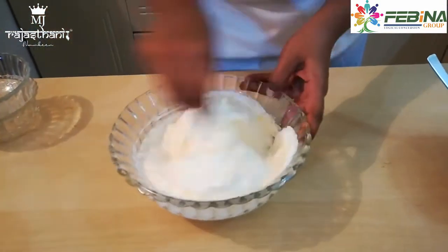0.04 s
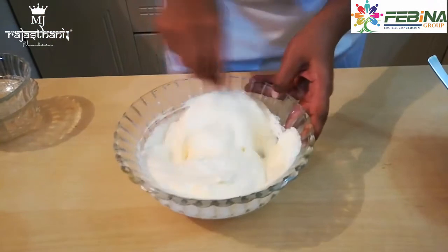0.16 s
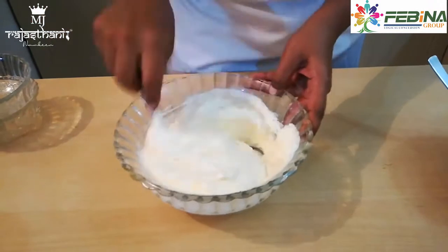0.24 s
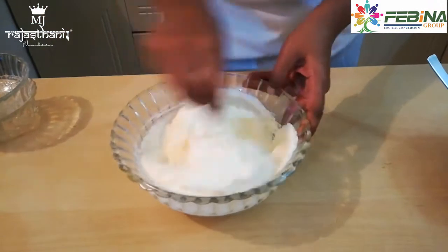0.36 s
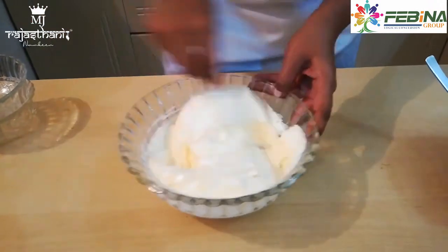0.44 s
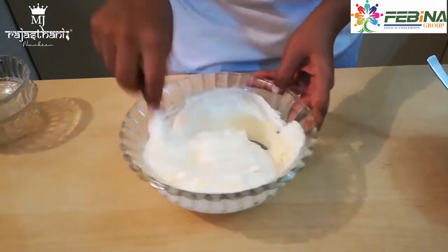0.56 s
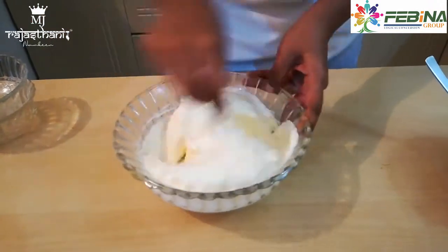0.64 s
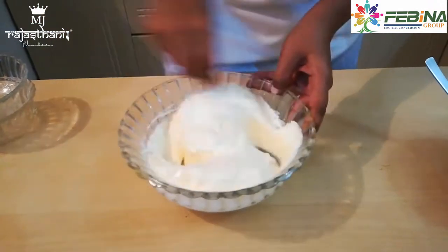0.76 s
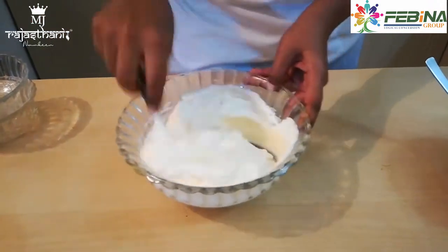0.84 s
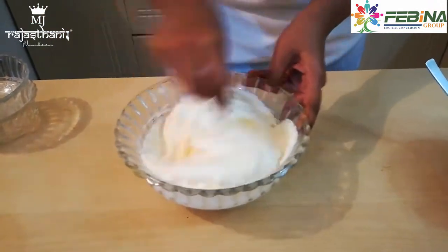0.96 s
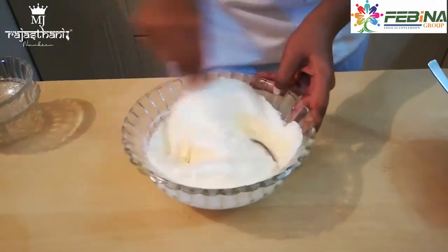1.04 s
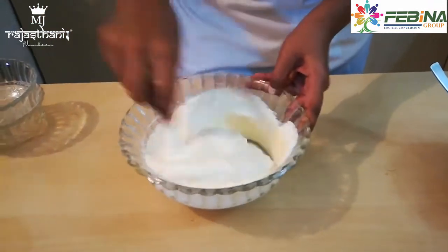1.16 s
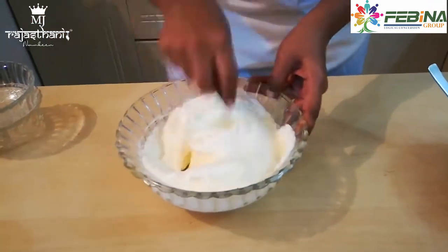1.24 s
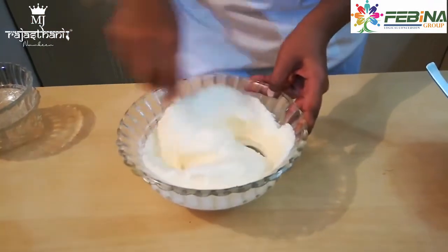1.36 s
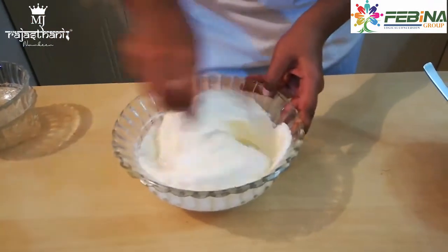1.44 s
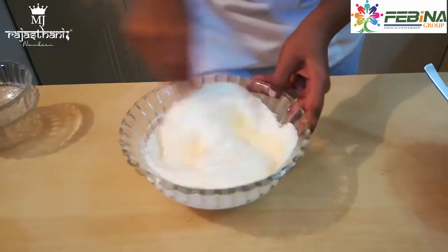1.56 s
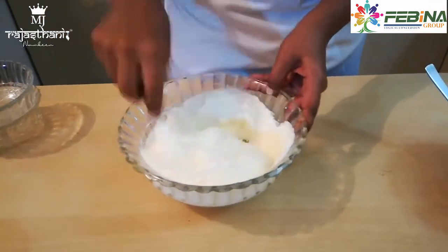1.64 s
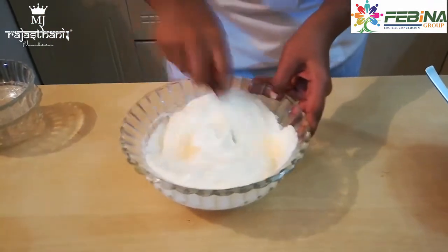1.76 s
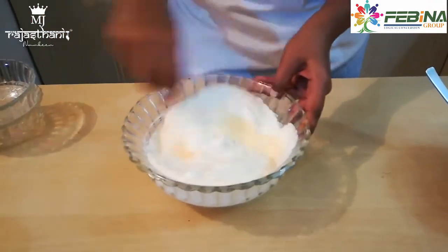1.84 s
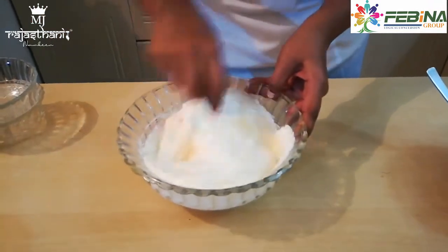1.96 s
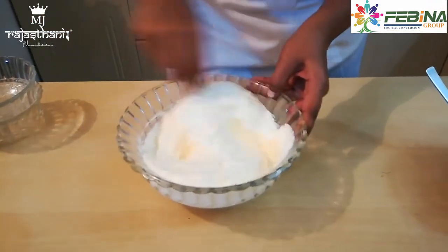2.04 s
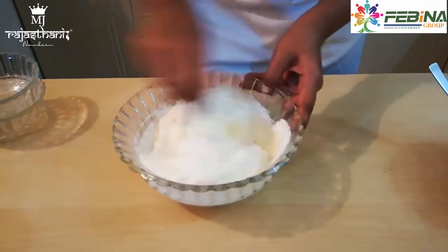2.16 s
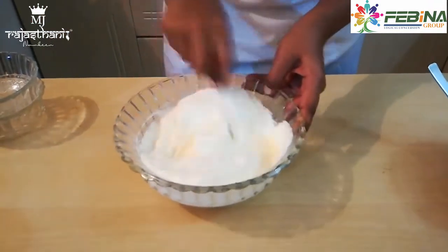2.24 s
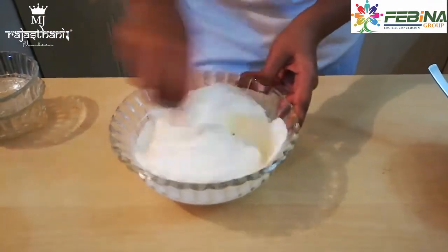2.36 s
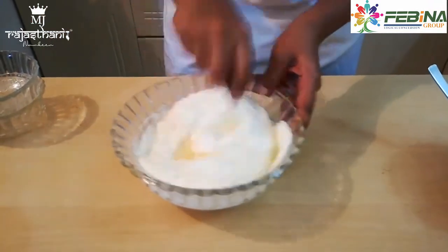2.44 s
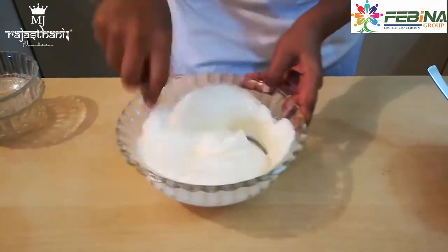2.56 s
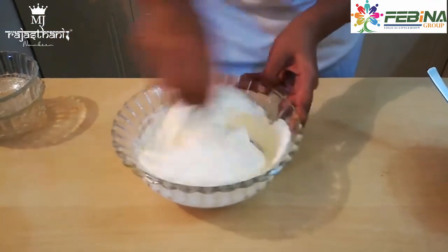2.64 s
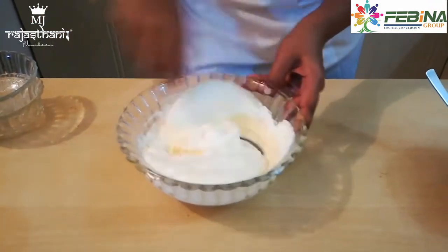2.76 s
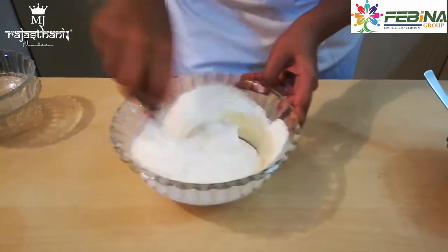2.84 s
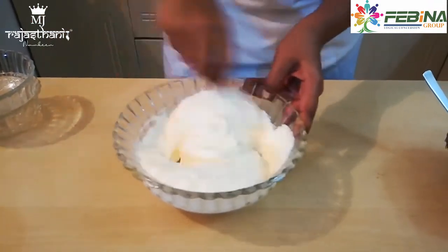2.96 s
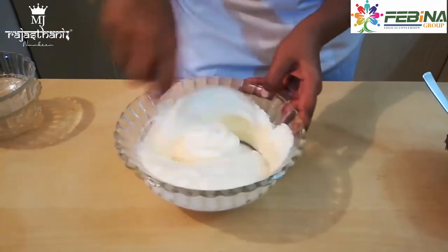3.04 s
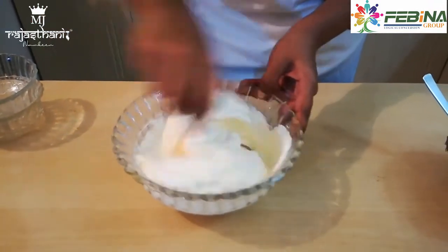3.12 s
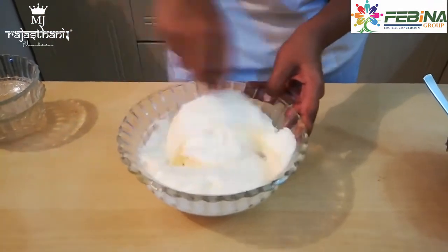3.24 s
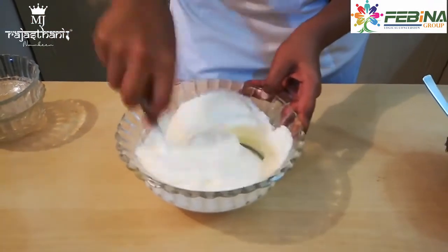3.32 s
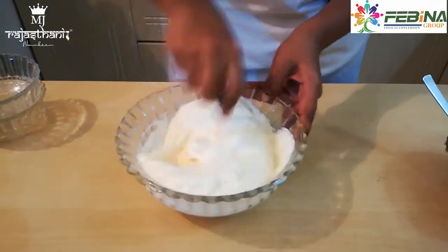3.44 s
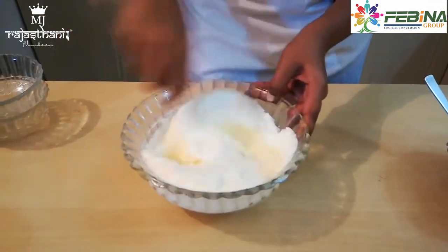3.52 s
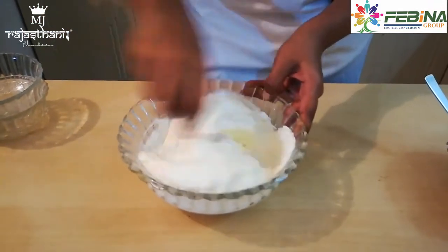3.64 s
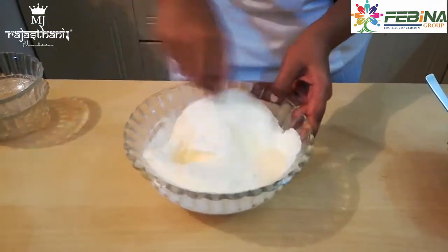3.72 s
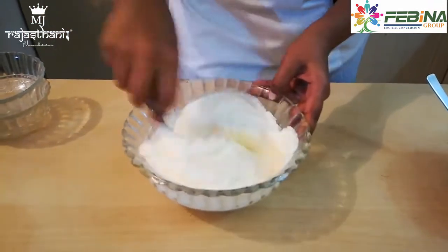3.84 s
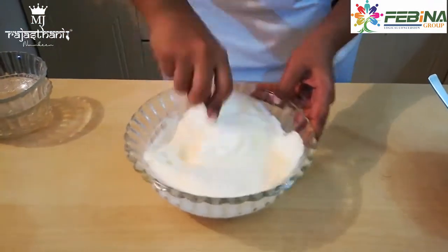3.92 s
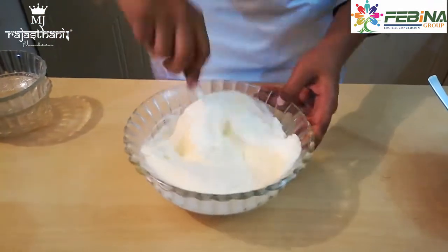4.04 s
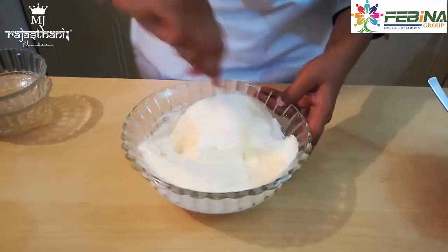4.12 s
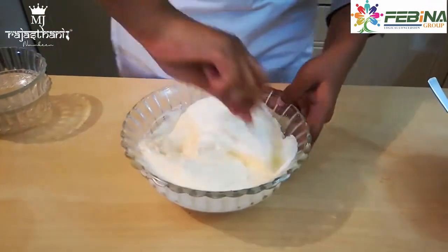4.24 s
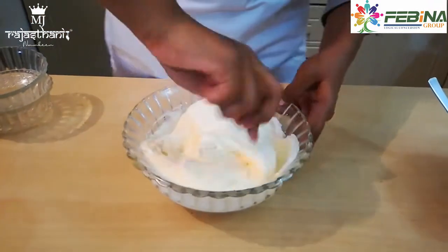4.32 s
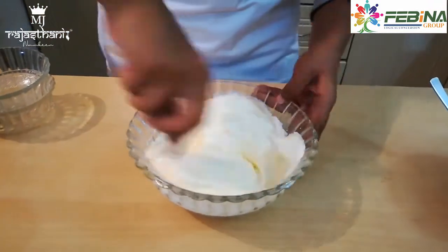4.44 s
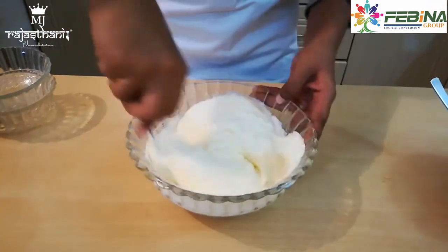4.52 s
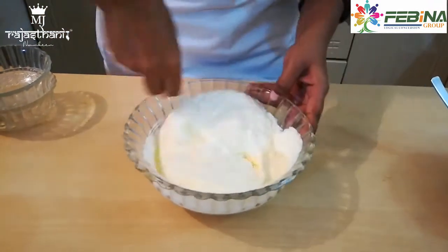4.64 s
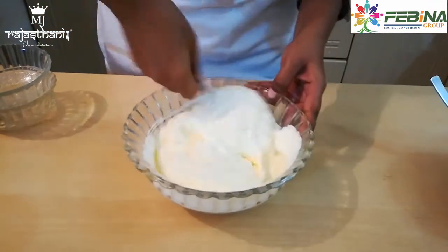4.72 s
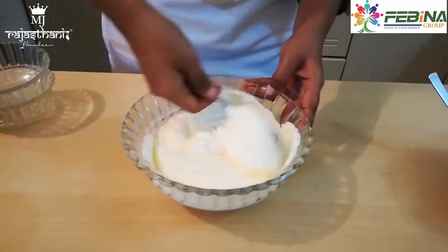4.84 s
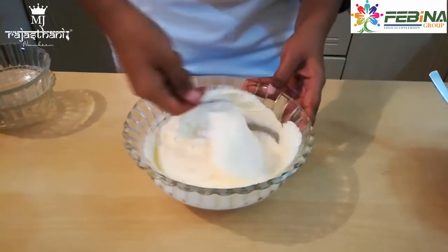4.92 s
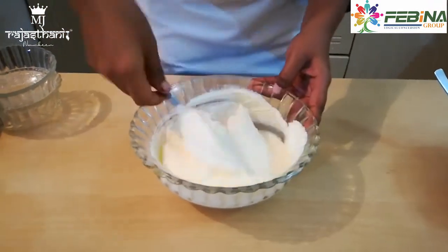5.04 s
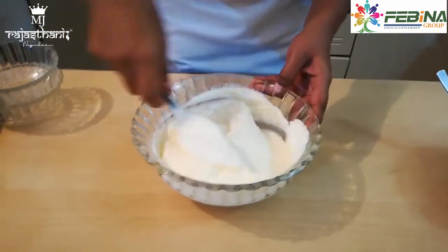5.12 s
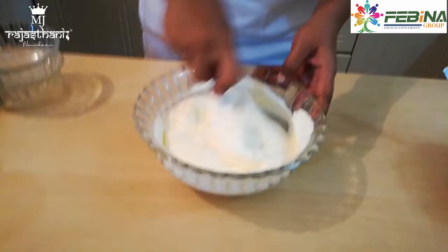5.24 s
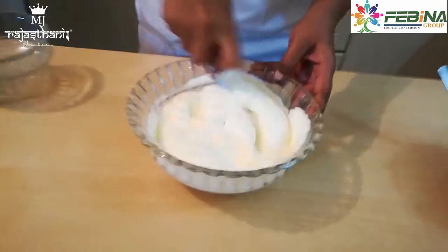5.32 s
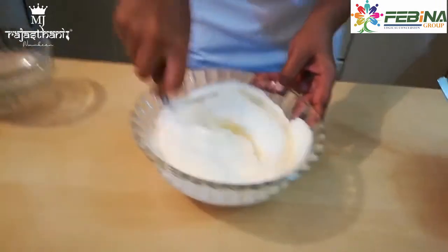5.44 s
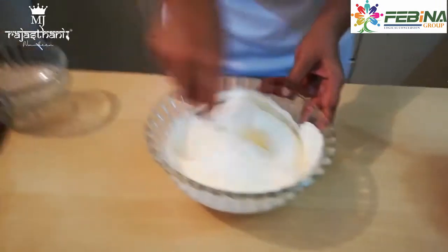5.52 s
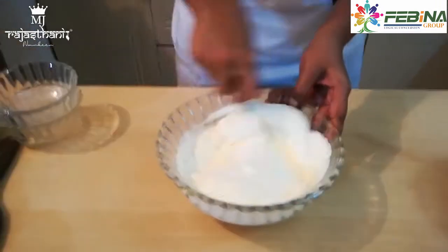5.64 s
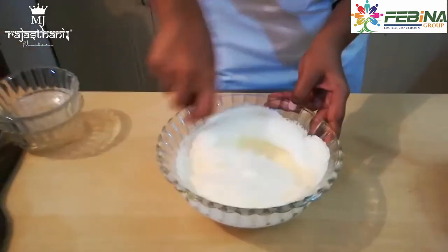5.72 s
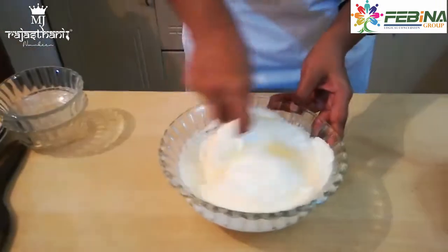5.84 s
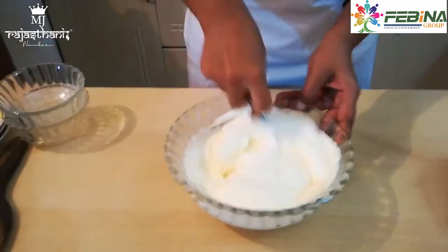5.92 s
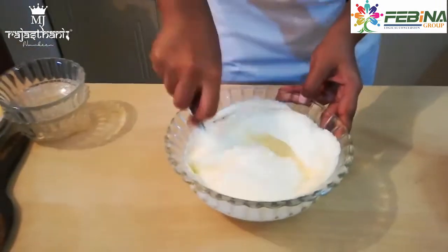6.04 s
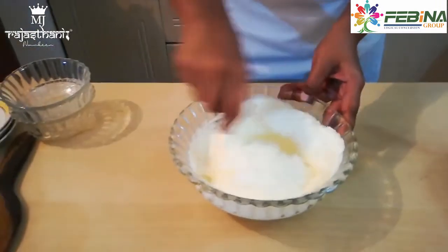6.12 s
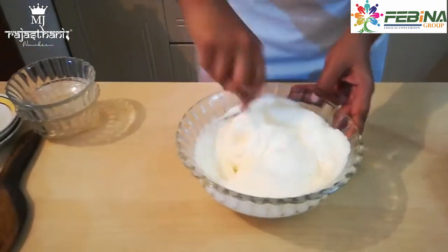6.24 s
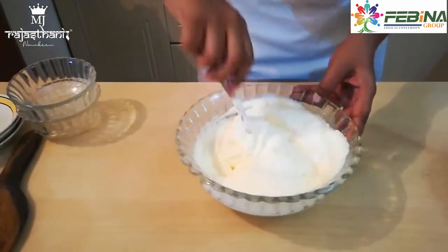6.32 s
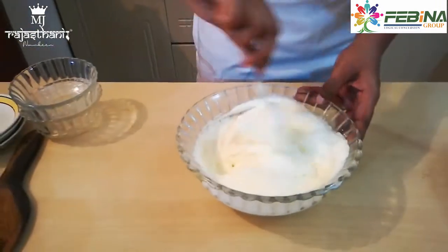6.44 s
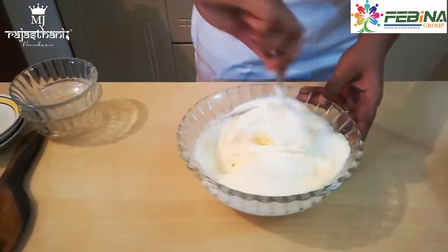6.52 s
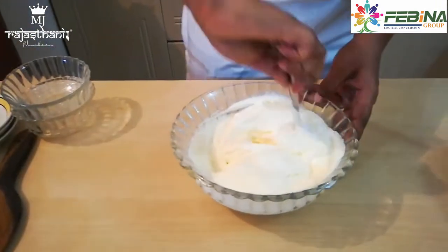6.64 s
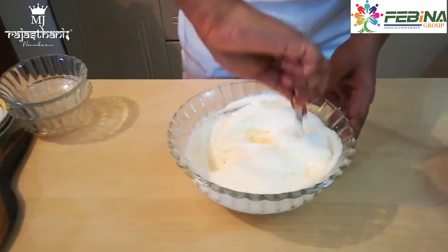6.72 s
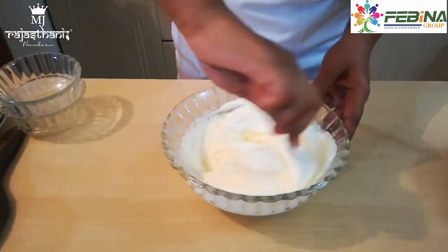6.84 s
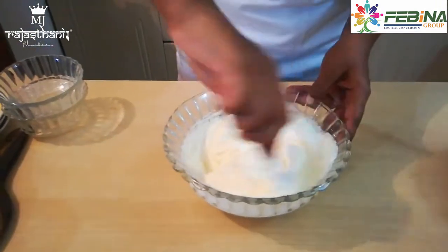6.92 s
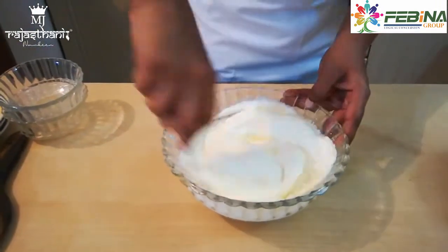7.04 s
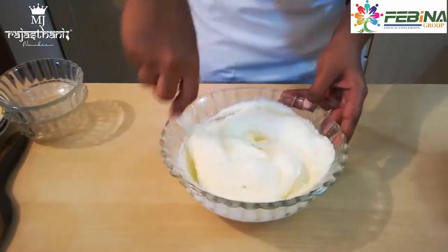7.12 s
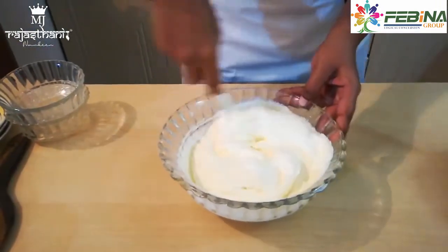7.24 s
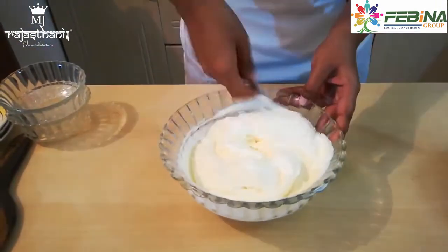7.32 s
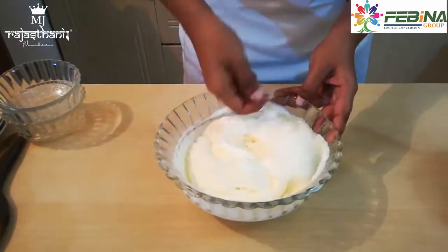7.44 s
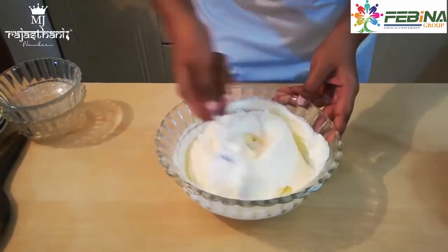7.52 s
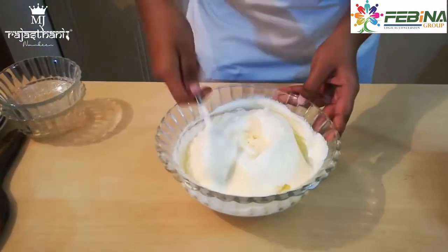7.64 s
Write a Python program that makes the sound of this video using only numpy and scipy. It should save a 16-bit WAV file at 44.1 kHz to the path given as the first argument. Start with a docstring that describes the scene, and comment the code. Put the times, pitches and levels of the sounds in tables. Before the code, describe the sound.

Fast wet churning with irregular spoon clinks on glass and dull thuds for four seconds, then slower separate clacks and soft plops in a bare room.

```python
"""A spoon beats thick cream in a glass bowl on a wooden table, in a bare, echoing kitchen with a faint hum.
It scrapes and churns from the start; soon short clacks (damped resonances) and wet pops join in.
Pushes thump the table (decaying sines) and flop the cream over (gritty noise through a cavity).
Now and then a gap slurps. Strokes come thick for about four seconds, then turn to sparser folding.
Noise echoes answer from the walls throughout."""
import sys
import numpy as np
from scipy import signal
from scipy.fft import rfft, irfft, next_fast_len
from scipy.io import wavfile
from scipy.ndimage import uniform_filter1d

SR = 44100
rng = np.random.default_rng(int(sys.argv[2]) if len(sys.argv) > 2 else 0)


def wav_out(sig):
    """Save sig, one row per channel (or a flat mono array), as 16-bit PCM at SR to the path in sys.argv[1]."""
    wavfile.write(sys.argv[1], SR, np.round(np.clip(np.atleast_2d(sig).T, -1, 1) * 32767).astype(np.int16))


N = 338667
TOP_HZ = 16000  # the microphone's band limit

# Levels in the event tables are relative: the functions shift them.
# Pushes of the spoon through the cream; at .125 the hollow body of the first clack:
# start_s, thump_db (table), plop_hz, plop_db, slap_db
PUSHES = [(.125, -57, 760, -39, -55), (.366, -39, 270, -52, -45), (.629, -38, 320, -40, -41.5),
          (.692, -42, 315, -39, -57), (.874, -39, 457, -44.5, -61), (.936, -37.5, 500, -34.5, -48),
          (1.16, -35, 374, -35, -46), (1.235, -37, 426, -39, -38.5), (1.484, -44, 493, -40.5, -41),
          (1.586, -35.5, 323, -38.5, -55), (1.729, -42.5, 430, -37.5, -40),
          (1.834, -34.5, 398, -43.5, -43.5), (1.981, -38.5, 356, -36.5, -37),
          (2.224, -38, 503, -44.5, -39.5), (2.451, -39.5, 380, -45, -39.5), (2.5299, -28, 440, -34.5, -36),
          (2.692, -38.5, 310, -37, -39.5), (2.922, -34.5, 490, -33, -32.5), (3.008, -40.5, 390, -43.5, -47),
          (3.18, -38.5, 344, -32, -42.5), (3.265, -33, 275, -34, -41), (3.371, -34, 350, -37, -51),
          (3.445, -37, 293, -29.5, -34.5), (3.668, -45, 517, -37, -61), (3.694, -39, 398, -33.5, -55),
          (3.768, -34, 293, -36, -59), (3.886, -30, 374, -35.5, -37.5), (4.472, -48, 600, -41.5, -46),
          (4.863, -47, 370, -54, -42.5), (5.569, -41.5, 400, -49, -59), (5.618, -45.5, 596, -45, -49),
          (5.859, -36, 333, -47, -51), (5.998, -46.5, 540, -46, -43.5), (6.2, -48, 740, -44, -46.5),
          (6.401, -75.5, 388, -51, -61), (6.929, -54, 714, -41, -46.5), (7.447, -43.5, 257, -56, -54)]
# The spoon meets the glass; at 3.911 a wall throws the clack back:
# start_s, knock_db, tick_hz, tick_db, crack_db
CLACKS = [(0.1237, -23, 5400, -19.5, -34), (.1259, -52, 3560, -27.5, -52), (0.3147, -51, 4200, -48, -59),
          (0.329, -58, 3870, -44.5, -70), (.388, -75, 5970, -56, -58), (.398, -58, 4000, -48, -71),
          (0.48, -65, 3984, -65, -52), (0.6308, -48, 3600, -39, -35.5), (.757, -42.5, 3980, -56, -54),
          (.934, -34, 3340, -35, -42.5), (.979, -58, 4690, -43, -56), (1.176, -39, 6000, -50, -66),
          (1.2074, -33.5, 3640, -37, -44), (1.329, -39, 4800, -36.5, -53), (1.481, -69, 3040, -34.5, -83),
          (1.4852, -59, 4350, -59, -34.5), (1.7298, -42, 2970, -36.5, -51), (1.9783, -46, 3600, -47, -34.5),
          (2.2104, -42, 4260, -30, -45), (2.306, -60, 6470, -48, -47), (2.364, -49, 4560, -45.5, -75),
          (2.4525, -36, 4280, -41.5, -37), (2.5306, -27.5, 2300, -51, -68), (2.6742, -41, 5240, -43, -48),
          (2.795, -54, 5280, -46, -54), (2.922, -42, 3770, -29, -67), (2.924, -47, 4370, -33, -37.5),
          (3.009, -53, 5000, -49, -58), (3.14, -70, 3540, -56, -53.5), (3.164, -33, 3900, -45, -69),
          (3.184, -40, 1980, -44, -68), (3.2667, -49, 5470, -53, -36), (3.395, -28.5, 3180, -30.5, -39),
          (3.396, -56, 5100, -34.5, -52), (3.448, -32, 2000, -46, -70), (3.5235, -39, 4700, -31, -28),
          (3.667, -36, 5330, -36, -66), (3.7697, -45, 5100, -45, -51), (3.8976, -22, 3600, -36, -34),
          (3.911, -27, 3640, -34.5, -44), (4.1328, -44, 3570, -51.5, -54), (4.473, -26, 4080, -29, -41),
          (4.6035, -31.5, 3540, -40, -44), (4.7301, -34.5, 4180, -38, -54), (4.8526, -40, 4960, -33.5, -69),
          (5.1242, -80, 5000, -57, -79), (5.609, -31, 4060, -41, -43), (5.9006, -29, 4030, -30, -48),
          (6.1861, -30, 4240, -33, -43.5), (6.416, -77, 4540, -56.5, -73),
          (6.9304, -26.5, 2970, -43.5, -39), (7.212, -40, 3820, -47.5, -66), (7.232, -50, 4760, -54, -70),
          (7.254, -39.5, 4800, -38.5, -67), (7.268, -48, 5200, -59, -70), (7.415, -46, 4670, -51, -74),
          (7.52, -52.5, 3950, -55, -82)]


def amp(db):
    """Turn decibels into gain."""
    return 10 ** (np.asarray(db) / 20)


def unit(x):
    """Scale a sound to rms 1."""
    return x / np.sqrt(np.mean(x ** 2) + 1e-20)


def along(points, hz):
    """Read a curve of (Hz, value) points on a log frequency axis."""
    f, v = np.transpose(points)
    return np.interp(np.log(hz + 1), np.log(f + 1), v)


def filtered(x, response):
    """Pass a sound through a complex response of frequency."""
    n = x.shape[-1]
    m = next_fast_len(n + min(n, SR // 4))  # room for the tail
    return irfft(rfft(x, m) * response(np.fft.rfftfreq(m, 1 / SR)), m)[..., :n]


def resonance(f, hz, q):
    """Response of one damped resonance: a higher q rings longer."""
    return 1j * f * hz / q / (hz * hz - f * f + 1j * f * hz / q)


def noise(spectrum, channels):
    """Make noise with a given spectrum, at rms 1."""
    return unit(filtered(rng.standard_normal((channels, N)), lambda f: amp(along(spectrum, f))))


def add(track, s, sound):
    """Mix a sound into a track at time s."""
    i = int(np.clip(round(s * SR), 0, N - 1))
    track[..., i:i + sound.shape[-1]] += sound[..., :N - i]


def ringing(modes, scatter_db):
    """Sum dying sines, each struck at a slightly random strength."""
    t = np.arange(SR * 2 // 3) / SR
    out = np.zeros(len(t))
    for hz, db, t60 in modes:
        level_db = db + scatter_db * rng.standard_normal()
        out += amp(level_db - 60 * t / t60) * np.sin(2 * np.pi * hz * t)
    return out


def ping(hz, q, soft=1.97, span=0.0043):
    """One blow through two resonances: a higher soft swells more slowly and sounds purer."""
    blow = signal.unit_impulse(SR // 20)
    ring = filtered(blow, lambda f: resonance(f, hz, q) * resonance(f, hz, soft))
    return unit(ring) * np.sqrt(span * SR / len(ring))  # as much energy as rms 1 for span seconds


def smear(envelope, hz, q, apart, grit_db=4):
    """Gritty rubbing heard through a cavity; a higher apart makes left and right less alike."""
    n = len(envelope)
    # the cream sticks and lets go
    grip = amp(grit_db * unit(uniform_filter1d(rng.standard_normal(n), size=130)))
    force = grip * (rng.standard_normal(n) + apart * rng.standard_normal((2, n)))
    return envelope * unit(filtered(force, lambda f: resonance(f, hz, q) * resonance(f, hz, 0.9)))


def background(air_db=-62, whine_hz=6700, whine_db=-79):
    """Still air is soft noise; an appliance adds steady hum tones and a thin band of whining noise."""
    # spectrum of the still kitchen: pitch_hz, level_db
    air_spectrum = [(25, -12), (50, -30), (100, -15), (160, -11), (205, -3.5), (245, -1), (320, -1),
                    (420, -19.5), (1200, -23), (3000, -21), (7000, -26.5), (15000, -23)]
    # hum tones: pitch_hz, level_db
    hum_tones = [(199.5, -63.5), (318, -71.5)]
    t = np.arange(N) / SR
    shared = noise(air_spectrum, channels=1)
    apart = noise(air_spectrum, channels=2)
    air = amp(air_db) * unit(shared + 11.0 * apart)
    hum = sum(amp(db) * np.sqrt(2) * np.sin(2 * np.pi * hz * t) for hz, db in hum_tones)
    hiss = rng.standard_normal((2, N))
    whine = amp(whine_db) * unit(filtered(hiss, lambda f: resonance(f, whine_hz, 29) ** 2))
    return air + hum + whine


def arm_effort():
    """How hard the arm stirs at every sample, in relative dB."""
    # points joined by straight lines: start_s, effort_db
    effort_points = [(0, -45.5), (.3, -50.5), (.55, -46), (.8, -45.5), (2.3, -44.5), (3.85, -42),
                     (4.25, -49.5), (4.45, -66), (4.75, -56), (5.1, -62.5), (5.5, -62.5), (6.05, -44.5),
                     (6.3, -54), (6.6, -63), (7.0, -65), (7.25, -53), (7.68, -62)]
    s, db = np.transpose(effort_points)
    return np.interp(np.arange(N) / SR, s, db)


def shake(rest_db=-63, effort_db=-1):
    """The table shakes low under the arm, more as it works harder."""
    # spectrum of the shaking: pitch_hz, level_db
    rumble_spectrum = [(10, 5), (22, -7), (31, 5.5), (40, -17), (60, -0.5), (77, -29), (110, -40),
                       (300, -51)]
    return np.hypot(amp(rest_db), amp(arm_effort() + effort_db)) * noise(rumble_spectrum, channels=1)


def slips(length, per_s, spread_db):
    """Force of a spoon that sticks and slips unevenly, swelling and fading over the stroke; stereo."""
    slip_t60 = 0.0053  # s, how fast one slip dies
    n, t = int(length * SR), np.arange(SR // 100) / SR
    when, size = rng.random(400), rng.standard_normal(400)
    count = int(np.clip(length * per_s, 3, len(when)))
    power = amp(spread_db * np.clip(size[:count], -2, 2)) ** 2
    jolts = np.bincount((when[:count] * n).astype(int), power, n)
    grip = np.sqrt(np.abs(signal.fftconvolve(jolts, amp(-60 * t / slip_t60) ** 2)[:n]))
    swell = np.sqrt(np.abs(np.sin(np.pi * np.sqrt(np.linspace(0, 1, n)))))
    rub = rng.standard_normal(n) + 1.3 * rng.standard_normal((2, n))
    return np.pad(swell * grip * rub, ((0, 0), (0, SR // 25)))  # silence to ring into


def hollow(force, hz, q=5, glide=1.116):
    """The hollow behind the spoon narrows during a stroke, so its resonance fades from low to high."""
    low, high = (filtered(force, lambda f: resonance(f, pitch, q)) for pitch in (hz / glide, hz * glide))
    fade = np.linspace(0, 1, force.shape[-1])
    return (1 - fade) * low + fade * high


def rim(x):
    """The bare rim above the cream is a set of resonances that ring faintly with what drives them."""
    # resonances of the rim: pitch_hz, level_db, q
    rim_modes = [(3506, -5.5, 16), (4790, -9, 26), (5160, -19, 93), (6400, -39, 98), (7140, -16, 69),
                 (7480, -9.5, 44)]
    return filtered(x, lambda f: sum(amp(db) * resonance(f, hz, q) for hz, db, q in rim_modes))


def scrapes(rasp_db=0, hollow_db=5, bare_db=-2, bare_hz=4700, ring_db=7):
    """Coarse slips rasp dully through cream and its hollow; fine ones hiss on glass and rattle the rim."""
    # strokes along the bowl; at 0.121 the gritty chatter of the first clack,
    # at .199 the hiss of its ring dying away:
    # start_s, length_s, hollow_hz, rasp_db (in cream), bare_db (on glass)
    strokes = [(0, 0.059, 910, -45.5, -51), (0.121, 0.0068, 890, -32, -36), (.199, 0.16, 890, -51.5, -48),
               (0.36, 0.035, 1080, -57, -51), (0.575, .055, 1690, -56.5, -66),
               (0.808, 0.036, 1200, -48.5, -76), (.87, 0.038, 1020, -49, -64),
               (1.162, 0.063, 980, -43, -57), (1.232, 0.051, 960, -46, -55),
               (1.364, 0.035, 1300, -51.5, -60), (1.442, .031, 1290, -49, -61),
               (1.584, 0.055, 870, -57, -49.5), (1.826, 0.074, 1050, -51, -53.5),
               (1.962, .052, 980, -43, -49), (2.066, 0.013, 1010, -43.5, -52.5),
               (2.225, 0.07, 1030, -48, -52), (2.547, 0.043, 1700, -43.5, -48),
               (2.609, 0.092, 1080, -42.5, -51), (2.827, 0.095, 1420, -52.5, -75),
               (3.18, .05, 870, -42, -58), (3.235, .032, 1050, -53, -66), (3.442, .05, 1000, -39.5, -67),
               (3.629, 0.052, 1082, -49, -48.5), (3.693, .029, 1000, -41.5, -64),
               (3.795, .02, 1600, -47, -48), (3.817, .028, 1160, -48, -53.5), (3.998, 0.065, 950, -46, -56),
               (4.782, 0.085, 1220, -59, -47), (5.491, 0.096, 930, -61, -74), (5.563, 0.051, 890, -54, -69),
               (5.719, 0.073, 1020, -63, -78), (5.862, 0.035, 1130, -53, -73),
               (7.151, 0.023, 1620, -53, -61), (7.276, 0.095, 1120, -73, -60),
               (7.363, 0.059, 1170, -57.5, -49)]
    # slips muffled by cream: pitch_hz, level_db
    rasp_spectrum = [(100, -19), (300, 2.5), (600, -1.5), (1200, 1), (1900, -0.5), (2500, -8.5),
                     (4000, -30.5), (9000, -49), (15000, -49)]
    coarse_per_s, fine_per_s = 200, 1500  # slips a second in cream and on glass
    out = np.zeros((2, N))
    for s, length, hz, rasp, bare in strokes:
        coarse = slips(length, coarse_per_s, spread_db=3.5)
        dull = filtered(coarse, lambda f: amp(along(rasp_spectrum, f)))
        dull = dull + amp(hollow_db) * hollow(dull, hz)
        fine = slips(length, fine_per_s, spread_db=2.0)
        bright = filtered(fine, lambda f: resonance(f, bare_hz, 1.18) ** 2)
        bright = bright + amp(ring_db) * rim(bright)
        sound = amp(rasp + rasp_db) * unit(dull) + amp(bare + bare_db) * unit(bright)
        add(out, s, sound * np.sqrt(length * SR / sound.shape[1]))  # same energy per second at any length
    return out


def bubbles(count, hz, spread, cycles, rise, size_db):
    """Scattered tiny air pockets, each a short rising ring with a soft start; stereo, rms 1."""
    when, pan = rng.random((2, count, 1))
    pitch = np.clip(hz * np.exp(spread * rng.standard_normal((count, 1))), 100, SR / 3)
    size = amp(size_db * np.minimum(rng.exponential(size=(count, 1)), np.e))
    k = np.arange(SR // 100)
    age = k / SR * pitch / cycles
    envelope = size * age * np.exp(-np.pi * age) * (1 - k / len(k))
    grain = envelope * np.sin(2 * np.pi * cycles * age * (1 + rise * np.minimum(age, 2)))
    at = ((when * N).astype(int) + k).ravel()
    sides = [np.bincount(at, (grain * side).ravel(), N)[:N] for side in (np.sqrt(pan), np.sqrt(1 - pan))]
    return unit(np.array(sides))


def clumps():
    """A random, smooth gain that bunches the bursting pockets."""
    clump_s, clump_db = 0.063, 3  # smoothing time and depth
    smooth = lambda x: uniform_filter1d(x, size=int(clump_s * SR))
    return unit(amp(clump_db * unit(smooth(smooth(rng.standard_normal(N))))))


def drag():
    """Gain of cream dragged on by the spoon: it swells after each push, more after a louder slap, and ebbs."""
    rise_s, release_s = 0.027, 0.058
    flow, t = np.zeros(N), np.arange(SR // 2) / SR
    swell = np.minimum(t / rise_s, 1) * np.exp(-np.maximum(t - rise_s, 0) / release_s)
    for s, _, _, _, slap in PUSHES:
        add(flow, s, amp(slap) * swell)
    return flow


def cream(churn_db=1.5, squelch_db=-11, crackle_db=-19,
          churn_drag_db=-1, squelch_drag_db=-13, crackle_drag_db=-17):
    """Cream churns as dull noise while air pockets burst in it; all follow the effort and each push."""
    # spectrum of the churning: pitch_hz, level_db
    churn_spectrum = [(30, -44), (90, -7.5), (122, 0.5), (175, -3.5), (240, -12), (450, -22.5),
                      (900, -29.5), (3000, -50)]
    beating_db, churn_grows = -40, 1.124  # reference effort; dB of churn per dB of effort
    effort, flow = arm_effort(), drag()

    def level(steady_db, drag_db):
        return np.hypot(amp(effort + steady_db), amp(drag_db) * flow)

    churn_level = level(churn_db + (churn_grows - 1) * (effort - beating_db), churn_drag_db)
    churn = churn_level * noise(churn_spectrum, channels=1)
    small = bubbles(count=3200, hz=1189, spread=0.424, cycles=6.7, rise=0.13, size_db=-0.5)
    tiny = bubbles(count=5000, hz=4250, spread=0.32, cycles=3.1, rise=0.022, size_db=4.5)
    squelch = clumps() * level(squelch_db, squelch_drag_db) * small
    crackle = clumps() * level(crackle_db, crackle_drag_db) * tiny
    return churn + squelch + crackle


def contacts(knock_hz=1000, knock_db=-3.0, pop_db=1, tick_db=0.5, steel_hz=3350, steel_db=-11,
             crack_hz=7700, crack_db=0, edge_hz=12500, edge_db=-14):
    """Clacks knock the damped bowl, tick and rebound; air pockets pop. Yields (s, glass, pocket)."""
    # air pockets that burst, most of them squeezed by a clack: start_s, pitch_hz, level_db, q
    pops = [(.3143, 1910, -42.5, 2), (.4765, 1500, -33.5, 4.2), (1.017, 2540, -42, 3.4),
            (.816, 1320, -43, 4), (.876, 1020, -41, 3.3), (1.386, 1400, -46, 2.7), (1.453, 1110, -43, 3),
            (2.56, 1710, -38, 4.8), (3.184, 1500, -40, 2.3), (3.82, 1160, -33, 3),
            (1.7288, 1520, -40.5, 3.3), (1.9685, 1650, -52, 3.4), (2.208, 1240, -38, 4),
            (2.533, 2200, -34.5, 6.5), (2.63, 850, -34.5, 3), (2.9228, 1670, -52, 3),
            (3.396, 1880, -29.5, 3.7), (3.667, 1720, -38, 2.7), (3.8972, 1950, -28.5, 5.2),
            (4.4748, 1760, -32, 3), (4.6046, 1800, -37, 3.2), (4.7292, 1640, -35.5, 4.2),
            (4.809, 1210, -36.5, 10), (4.8528, 1200, -29, 4.4), (4.8528, 1640, -36.5, 3.8),
            (5.609, 1650, -46, 5.9), (5.9003, 1800, -30.5, 2.3), (6.1868, 2000, -27, 4),
            (6.186, 2400, -44, 4), (6.9305, 1830, -36.5, 6.4), (6.9305, 2670, -40, 2.3),
            (7.151, 1540, -50, 2.4), (7.2103, 1655, -33, 7.8), (7.2235, 1670, -51, 7.7),
            (7.232, 1630, -43, 4), (7.254, 1630, -40, 2.3), (7.2664, 1640, -47, 2.7),
            (7.415, 1540, -48, 1.7)]
    rebound_s, rebound_spread, rebound_db = 0.0018, .15, -13.5  # one bounce: delay, its scatter, level
    for s, knock, tick_hz, tick, crack in CLACKS:
        steel = amp(tick + tick_db) * ping(tick_hz, q=2.8) + amp(tick + steel_db) * ping(steel_hz, q=3.0)
        glass = amp(knock + knock_db) * ping(knock_hz, q=0.63) + steel
        glass -= amp(crack + crack_db) * ping(crack_hz, q=1.05)
        glass -= amp(crack + edge_db) * ping(edge_hz, q=2.7)
        delay = int(SR * rebound_s * np.exp(rebound_spread * rng.standard_normal()))
        rebound = amp(rebound_db) * np.pad(steel, (delay, 0))[:len(glass)]
        yield s, glass + rebound, 0
    for s, hz, db, q in pops:
        yield s, 0, amp(db + pop_db) * ping(hz, q=q, soft=q)


def spoon(pop_send=0.6, scatter_t60=0.013):
    """Contacts as sent to the walls, and as heard nearby after bouncing round the bowl in stereo."""
    sent, near = np.zeros(N), np.zeros((2, N))
    t = np.arange(SR // 50) / SR
    for s, glass, pocket in contacts():
        bounces = rng.standard_normal(len(t)) + 1.9 * rng.standard_normal((2, len(t)))
        bounces = bounces * amp(-60 * t / scatter_t60)
        paths = signal.unit_impulse(len(t)) + .75 * unit(bounces) / np.sqrt(len(t))
        clack = glass - pocket
        heard = signal.fftconvolve(clack[None], paths, axes=1)[:, :len(clack)]
        add(near, s, unit(heard) * np.std(clack))
        add(sent, s, glass - pop_send * pocket)  # pockets open upward, away from the walls
    return sent, near


def after_ring(after_db=-29, hard_db=-19, grows=1.4):
    """Ticks leave the bowl singing; the cream smothers softer ones more, so the song grows faster."""
    # the bowl's long, faint ring: pitch_hz, level_db, t60_s
    bowl_modes = [(3400, -9, .45), (4530, -13, .22), (4830, -8, 0.31), (5020, -8, .35), (7321, -4, 0.65),
                  (7580, -17.5, .45), (7440, -9, 0.57)]
    out = np.zeros(N)
    for s, _, _, tick, _ in CLACKS:
        song = ringing(bowl_modes, scatter_db=3)
        add(out, s, amp(hard_db + grows * (tick - hard_db) + after_db) * song)
    return out


def folds(plop_db=5.5, plop_t60=0.093, slap_hz=1300, slap_db=3, slap_t60=0.071):
    """Cream flops over behind the spoon: a hollow plop at its own pitch, and a wet slap."""
    out, t = np.zeros((2, N)), np.arange(SR // 12) / SR
    for s, _, plop_hz, plop, slap in PUSHES:
        plop_fade = amp(plop + plop_db - 60 * t / plop_t60)
        slap_fade = amp(slap + slap_db - 60 * t / slap_t60)
        add(out, s, smear(plop_fade, plop_hz, q=1.08, apart=0.99))
        add(out, s, smear(slap_fade, slap_hz, q=0.77, apart=0.86))
    return out


def table(thump_db=8, wall_s=0.0276, wall_db=-2, boom_db=1):
    """Each push rocks the table top; a wall throws the thump back and the room's low modes boom on."""
    # modes of the table top: pitch_hz, level_db, t60_s
    board_modes = [(136.6, 5, 0.099), (182.6, -1, 0.047), (273.2, -9, 0.12)]
    # low modes of the room: pitch_hz, level_db, t60_s
    boom_modes = [(118.2, -7, 1), (142.2, -17, 0.31), (176.2, -13, 1), (207, -16, 1), (283, -13, 0.23),
                  (323, -28, 0.32), (370, -22, 0.18), (479, -13.5, 0.22), (528, -9, 0.27)]
    out = np.zeros(N)
    for s, thump, _, _, _ in PUSHES:
        thud = -amp(thump + thump_db) * ringing(board_modes, scatter_db=1.0)
        add(out, s, thud)
        add(out, s + wall_s, amp(wall_db) * thud)
        add(out, s + 2 * wall_s, amp(thump + boom_db) * ringing(boom_modes, scatter_db=4.5))
    return filtered(out, lambda f: resonance(f, 171, 0.92))  # the board radiates little far from its pitch


def slurps(slurp_db=1):
    """Air is drawn through a narrow gap between spoon and cream: a quick swell at the gap's pitch."""
    # cream sucking off the spoon: start_s, length_s, pitch_hz, level_db
    sucks = [(0.727, 0.024, 2980, -52), (2.833, 0.021, 2230, -44.5), (3.819, 0.029, 1240, -42.5),
             (4.813, 0.038, 1210, -47.5), (5.994, 0.027, 637, -43.5)]
    out = np.zeros((2, N))
    for s, length, hz, db in sucks:
        swell = np.sin(np.pi * np.sqrt(np.linspace(0, 1, int(length * SR))))
        add(out, s, amp(db + slurp_db) * smear(swell, hz, q=6.8, apart=0.12))
    return out


def kitchen(x):
    """Hard walls answer with dying noise, alike in the bass; a new random pattern every third of a second."""
    # how long echoes last: pitch_hz, t60_s
    echo_times = [(150, 0.4), (500, 0.42), (1500, 0.49), (5000, 0.46), (9000, 0.43), (15000, 0.21)]
    # strength of the echoes: pitch_hz, level_db
    echo_levels = [(60, -2.5), (170, -5), (450, 5), (1000, 1), (2000, 0.5), (4500, -8.5), (7500, -7.5),
                   (14000, -1.5)]
    # left-right likeness of the echoes: pitch_hz, likeness (1 = the same)
    likeness = [(150, .99), (300, 0.36), (600, 0), (2000, 0)]

    def mid_side(f):
        turn = np.arccos(np.clip(along(likeness, f), -1, 1)) / 2
        return amp(along(echo_levels, f)) * [np.cos(turn), np.sin(turn)]

    out, hop = np.zeros((2, N)), SR // 3
    for start in range(0, N, hop):
        hz, t, z = signal.stft(rng.standard_normal((2, SR * 2 // 3)), SR, nperseg=256)
        t60 = along(echo_times, hz)[:, None]
        decay = amp(-60 * t / t60) * np.sqrt(2 * np.log(1000) / (t60 * SR))  # equal energy at any t60
        tails = signal.istft(z * decay, SR, nperseg=256)[1]
        mid, side = filtered(tails, mid_side)
        echo = signal.fftconvolve(x[None, start:start + hop], [mid + side, mid - side], axes=1)
        add(out, start / SR + .006, echo)
    return out


def balance(x, points, lead_s=0):
    """Lean each frequency left or right at constant power; the left side may lead."""
    def response(f):
        side = np.array([[.5], [-.5]])
        gain = amp(side * along(points, f))
        gain = gain / np.sqrt(np.mean(gain ** 2, axis=0))
        return gain * np.exp(2j * np.pi * f * side * lead_s)

    return filtered(x, response)


def scene(lead_s=0.000086, clack_room_db=1.0, rim_room_db=-3):
    """The bowl stands a little to the left; two microphone ports colour bowl and echoes alike."""
    # lean of the direct sound: pitch_hz, left_minus_right_db
    facing = [(600, -0.5), (1100, -3), (1700, -6), (2300, 9), (3700, -2.5), (5500, -0.5), (7800, -4),
              (13000, 5)]
    # colour of the microphone ports: pitch_hz, left_minus_right_db
    ports = [(100, 0.6), (300, 0), (600, -4.5), (1100, -0.5), (1700, -3), (2300, -4.5), (3000, 2),
             (4500, 2), (5500, 12), (6500, 7.5), (7800, 21.5), (9500, 10.5), (13000, 0)]
    near_wall_s, near_wall_db = 0.012, -16  # the first wall's answer to a clack: delay, level
    clacks, near_clacks = spoon()
    soft = folds() + slurps() + scrapes() + cream() + table()
    ring = rim(clacks + soft[0]) + after_ring()
    direct = balance(near_clacks + soft + ring, facing, lead_s)
    echoes = kitchen(amp(clack_room_db) * clacks + soft[0] + amp(rim_room_db) * ring)
    add(echoes, near_wall_s, amp(near_wall_db) * near_clacks)
    return balance(direct + echoes, ports) + shake() + background()


def record(dry):
    """The microphone dulls the highest treble and keeps nothing above its band limit."""
    colour = [(100, -2.0), (7700, 1), (10500, -6), (15000, -13.0)]  # pitch_hz, level_db
    return filtered(dry, lambda f: amp(along(colour, f)) * (f < TOP_HZ))


dry = scene()
out = record(dry)
wav_out(out)
```